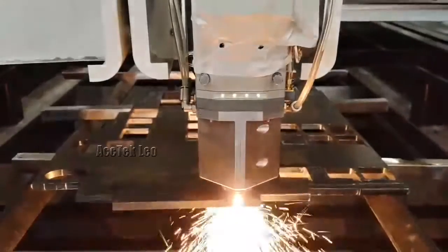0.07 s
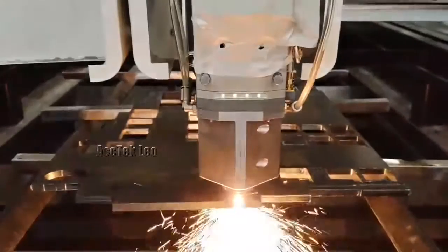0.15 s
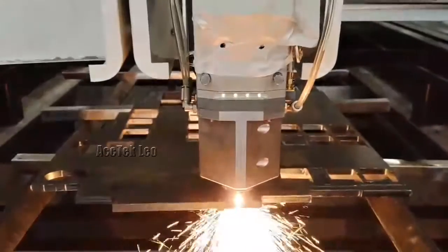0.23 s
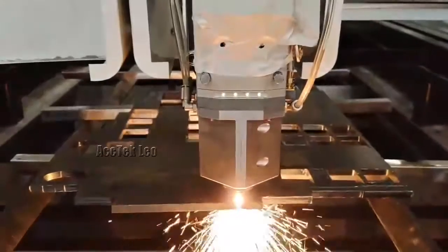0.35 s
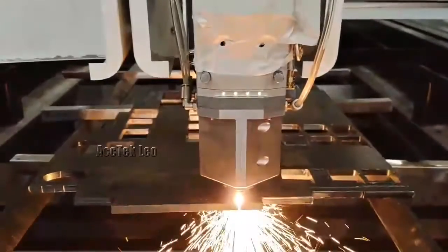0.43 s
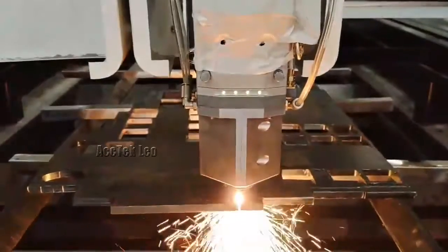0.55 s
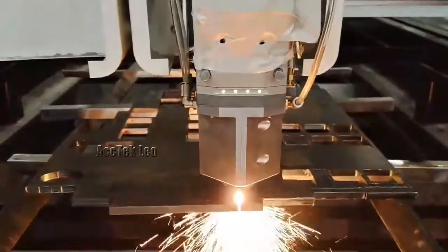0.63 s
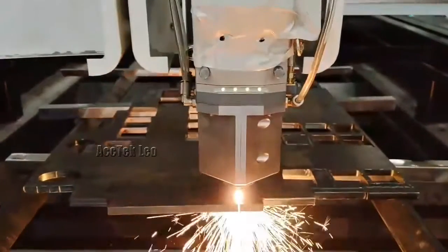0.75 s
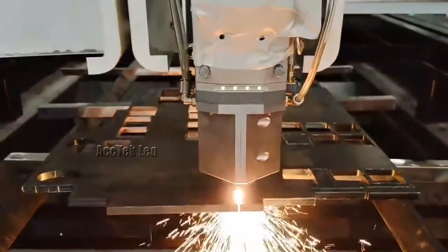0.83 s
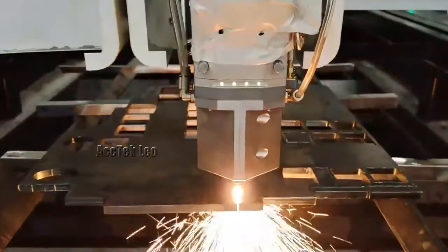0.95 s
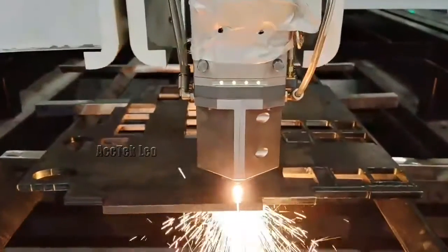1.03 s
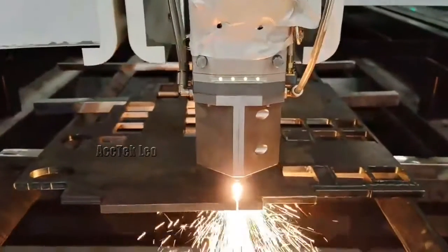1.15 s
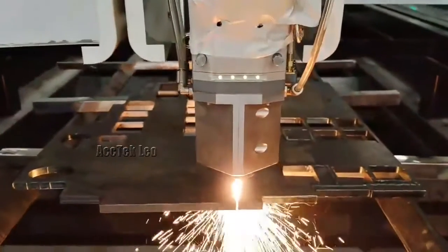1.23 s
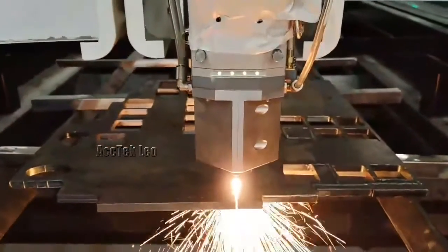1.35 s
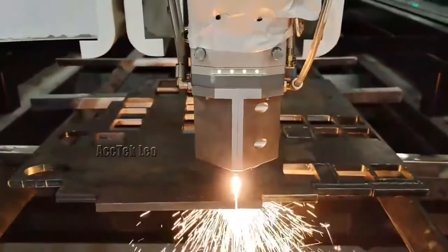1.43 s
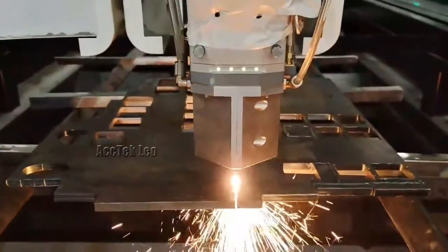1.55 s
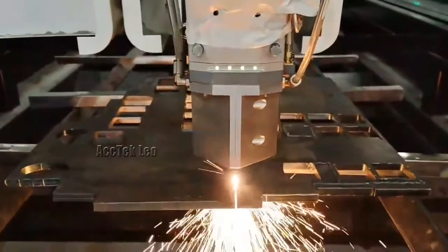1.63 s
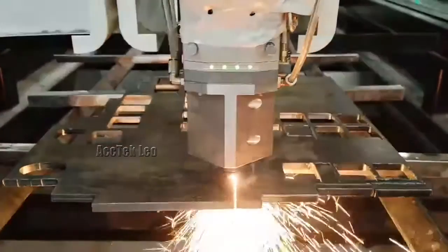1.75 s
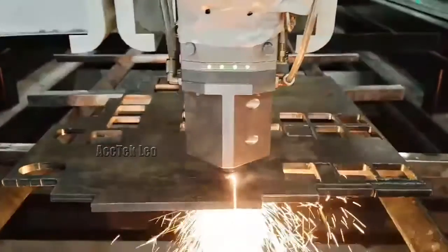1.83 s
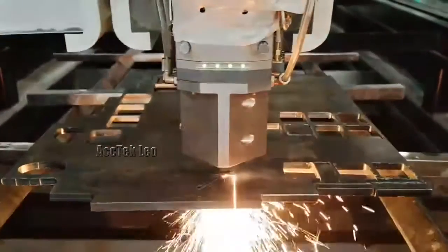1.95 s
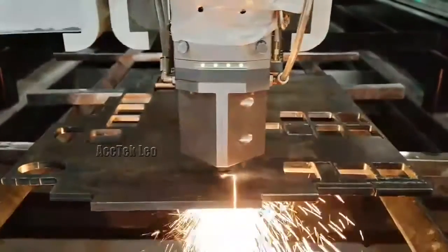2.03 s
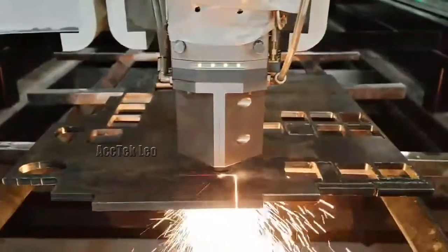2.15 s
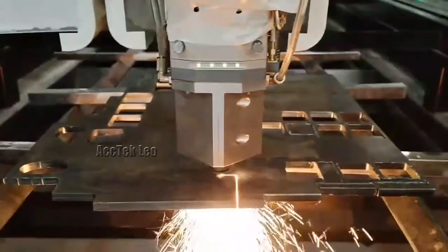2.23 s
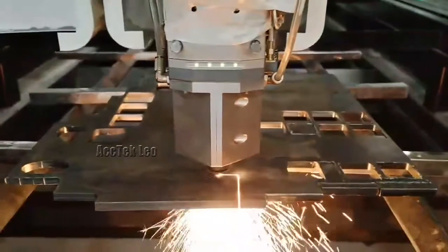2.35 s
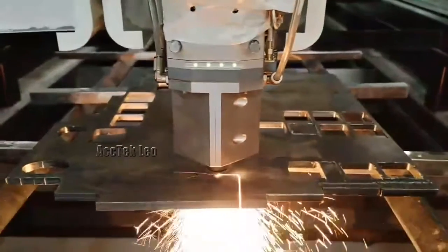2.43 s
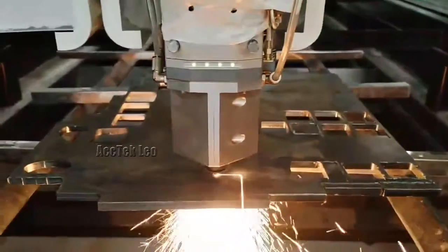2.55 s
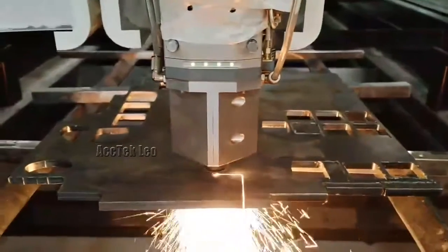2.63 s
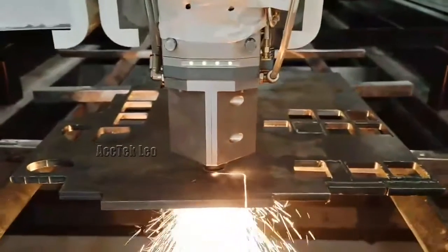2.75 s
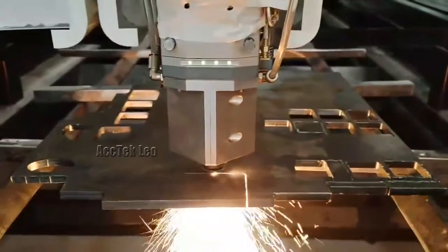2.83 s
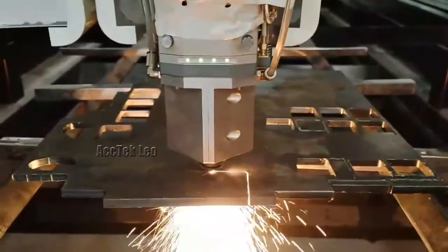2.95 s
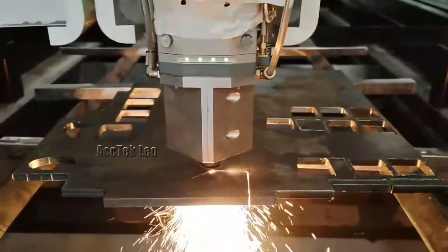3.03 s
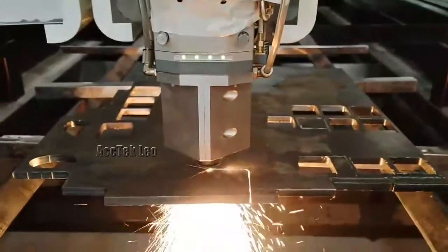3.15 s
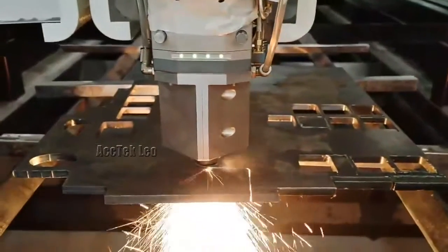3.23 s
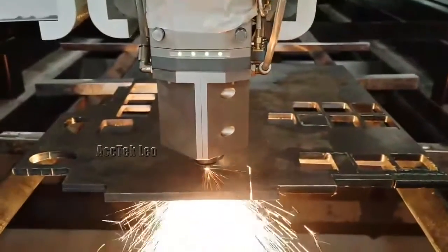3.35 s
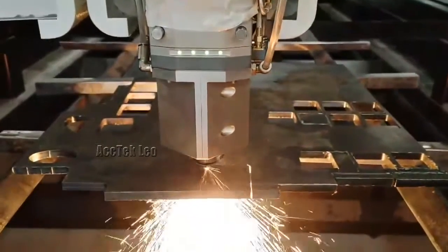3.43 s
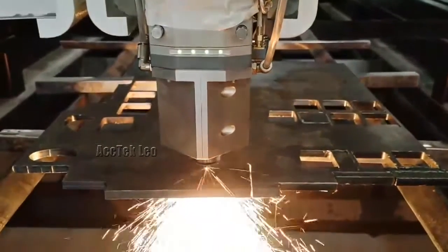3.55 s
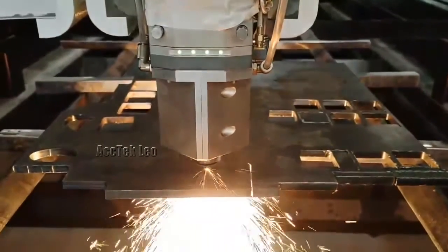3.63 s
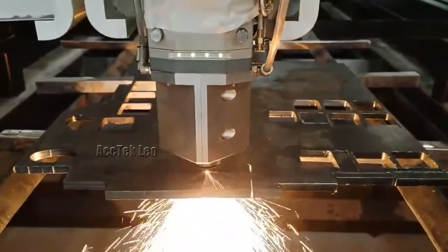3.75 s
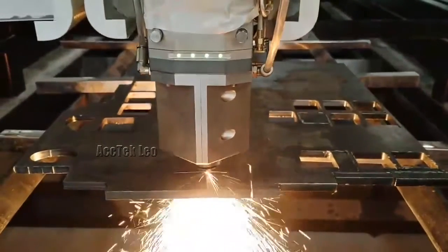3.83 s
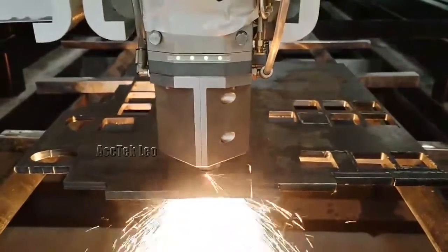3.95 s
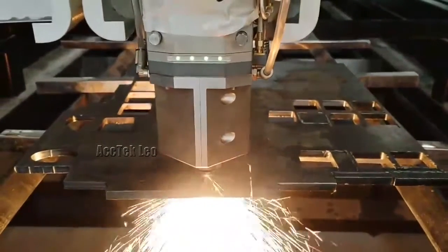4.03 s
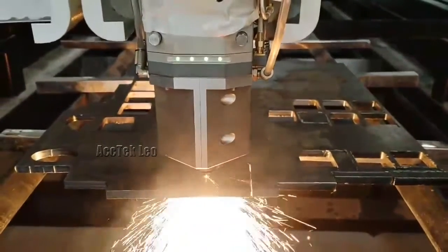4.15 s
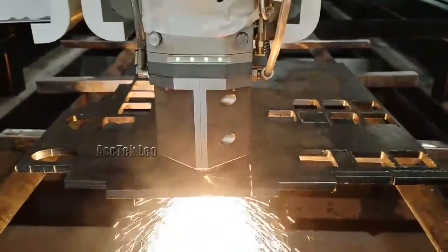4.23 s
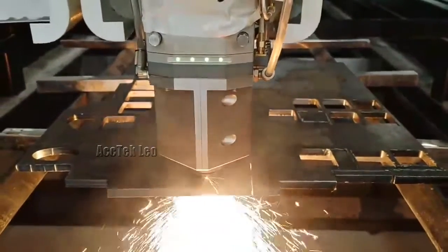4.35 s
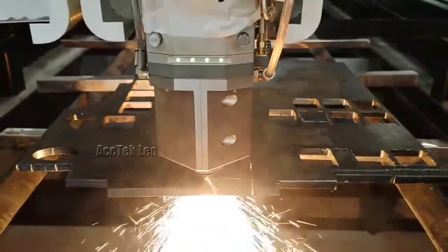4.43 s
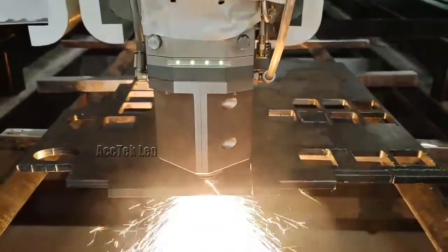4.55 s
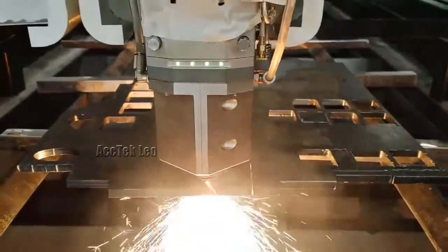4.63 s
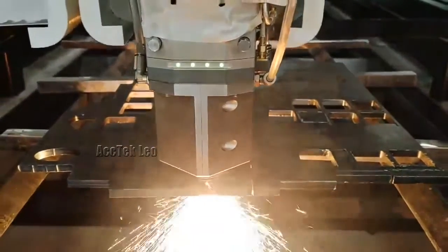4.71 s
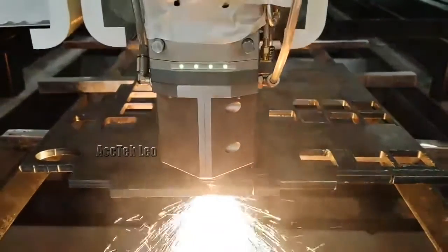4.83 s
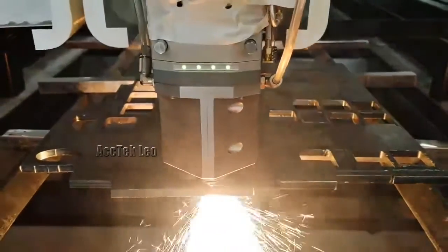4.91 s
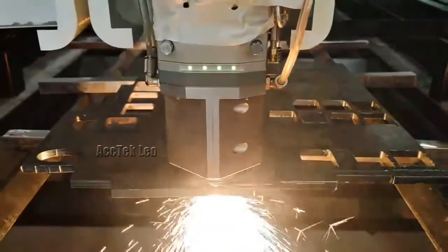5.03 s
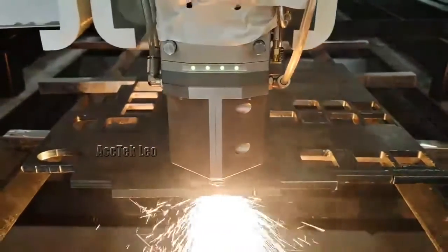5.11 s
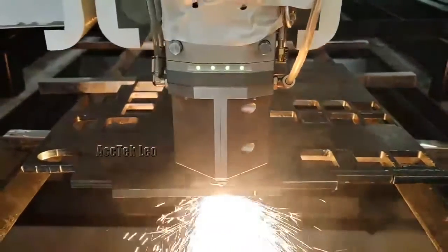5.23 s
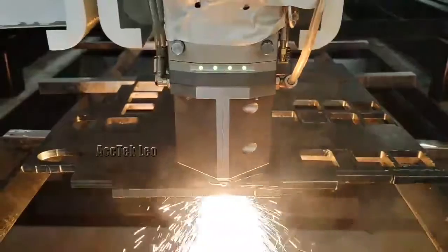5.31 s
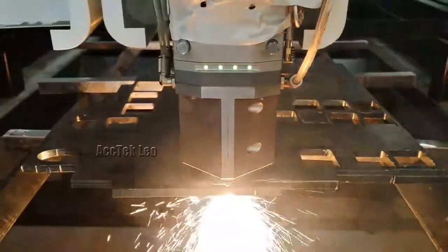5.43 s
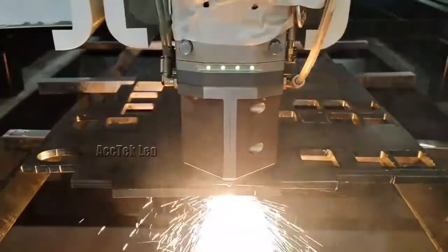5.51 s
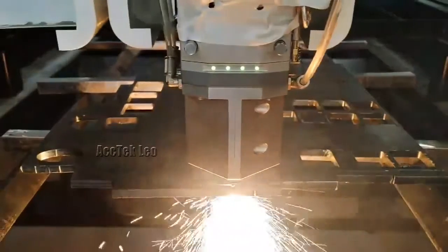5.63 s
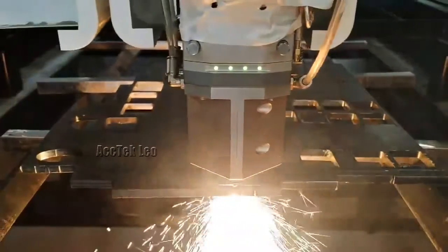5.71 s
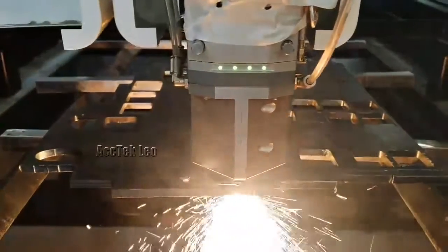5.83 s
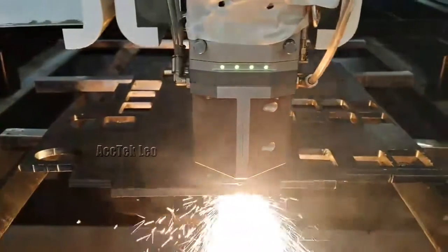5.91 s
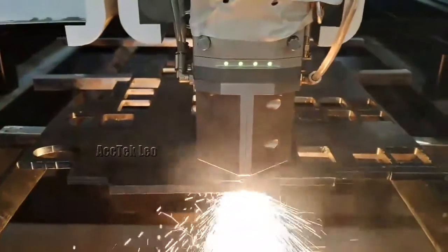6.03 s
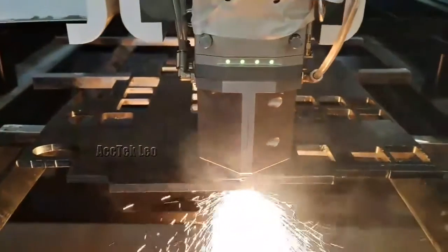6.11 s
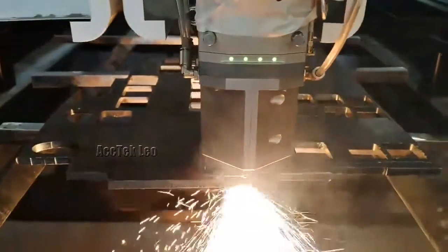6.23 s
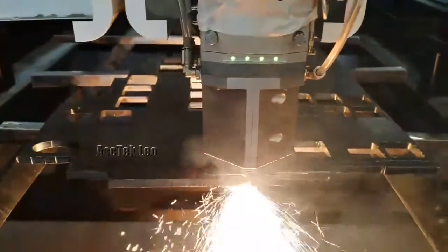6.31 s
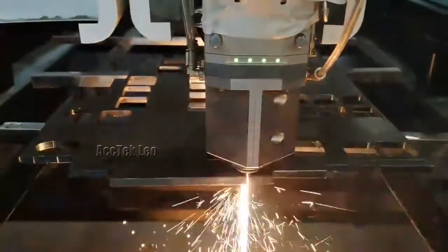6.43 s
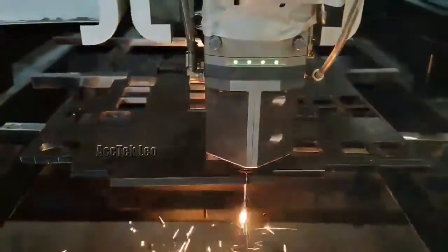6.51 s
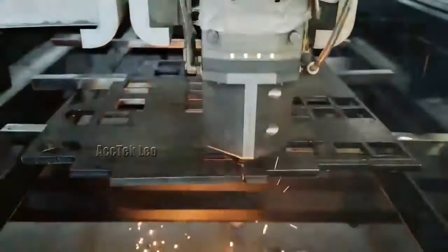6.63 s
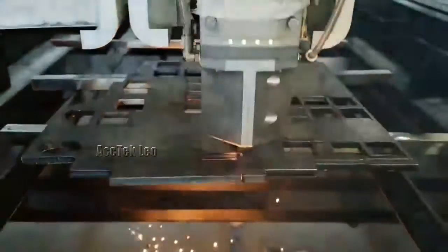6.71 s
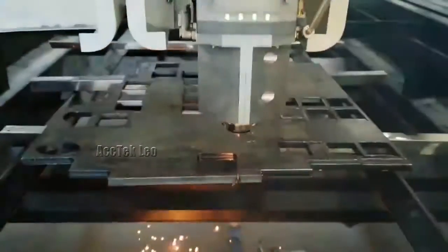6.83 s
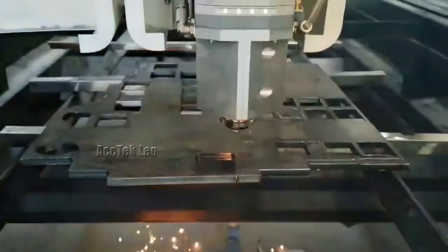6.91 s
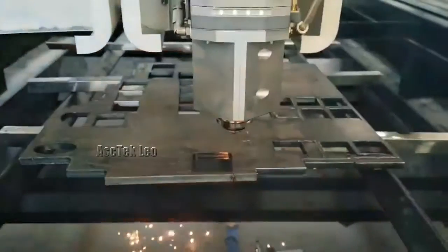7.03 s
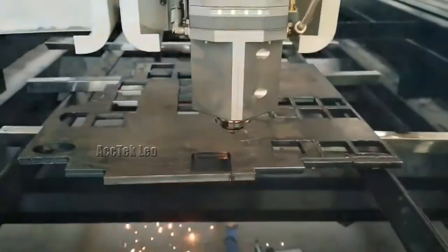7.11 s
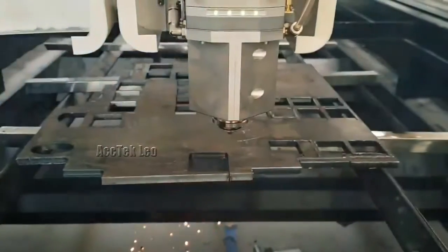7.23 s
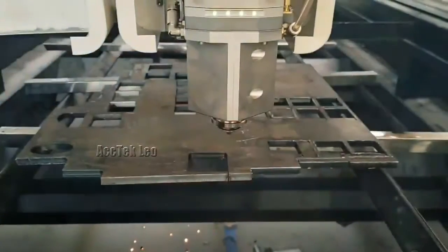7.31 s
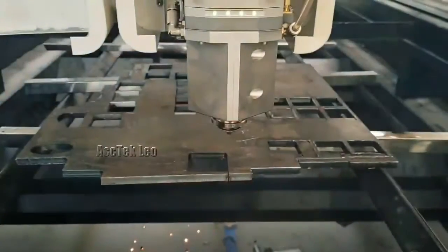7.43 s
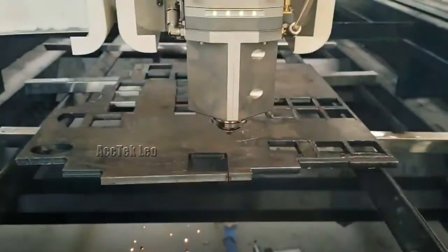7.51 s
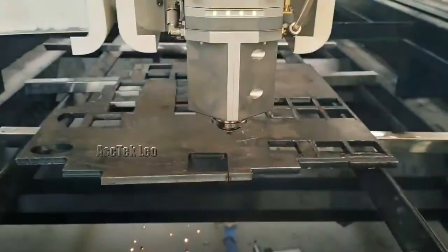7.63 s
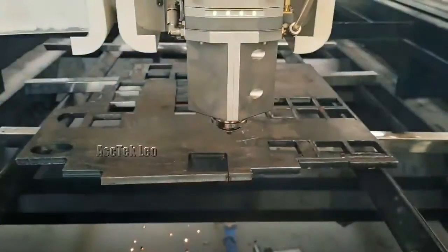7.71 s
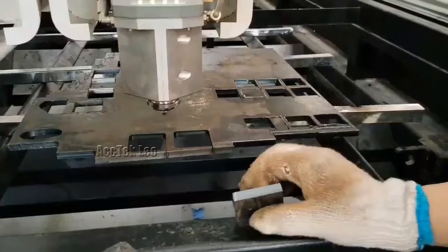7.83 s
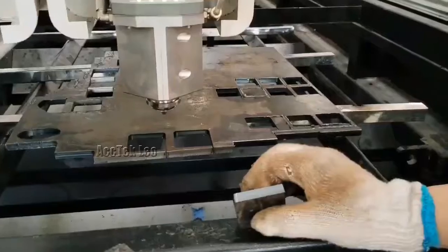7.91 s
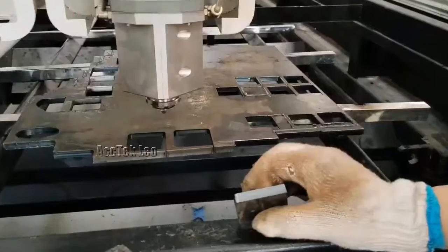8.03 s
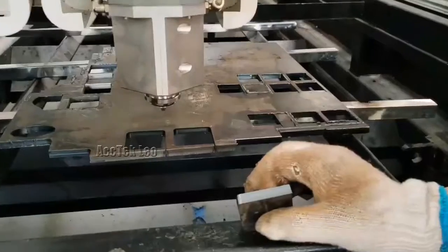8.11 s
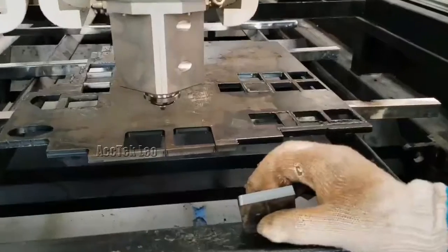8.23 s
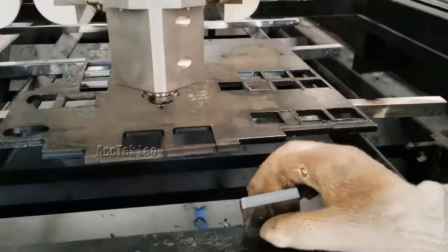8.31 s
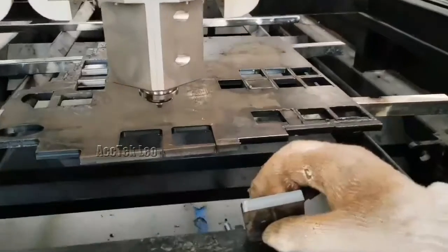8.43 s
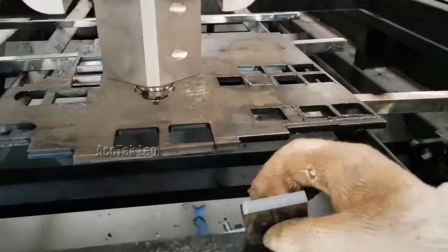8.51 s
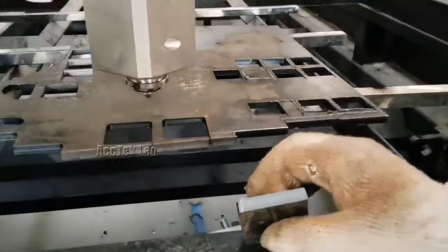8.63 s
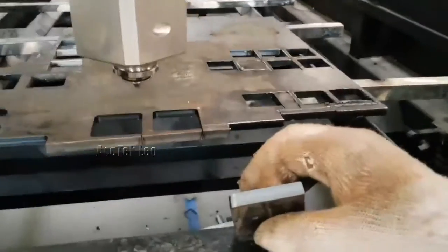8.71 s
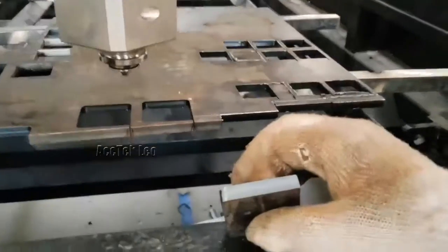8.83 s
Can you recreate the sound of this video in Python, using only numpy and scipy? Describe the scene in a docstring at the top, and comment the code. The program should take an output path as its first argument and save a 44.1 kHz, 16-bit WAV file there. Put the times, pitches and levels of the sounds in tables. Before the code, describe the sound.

From 0 to about 1.8 s a close, loud gas jet hisses at the plate edge, concentrated high around 5 to 8 kHz, gradually weakening and wavering, with sliding hollow and bright bands and faint low moans from the machine frame. At 1.9 s it jumps louder and fuller as it enters the steel, then stays a dense, steady, slightly fluttering hiss until 6.55 s. The valve closes: the hiss collapses in a fraction of a second with a very soft low thump, leaving thin leaking gas, faint whistles and a soft puff near 6.8 s. At 6.95 s a strong purge blasts for about a quarter second, with two dull, short metal knocks at 7.0 and 7.1 s, and falls away by 7.35 s. Near quiet follows, with a tiny spit at 7.7 s. Complete silence lasts from 7.83 to 7.97 s; then low motor hum around 110 and 220 Hz, fan wash and a thin 8 kHz whine, stronger at right, continue to the end.

```python
"""A gas jet burns a square out of thick steel: hiss over the plate edge, then in the kerf, a purge and its decay.
The jet is coloured noise in five bands, combed by echoes, with gliding bright bands and dark hollows.
Resonant noise makes brief whistles and frame moans; damped sines make the slug's knocks, a sine the valve thump.
After a short silence the workshop fades in: fan wash from noise, a motor hum and a thin drive whine from sines.
All is heard close up at two microphone ports."""
import sys
import numpy as np
from scipy import signal
from scipy.io import wavfile
from scipy.ndimage import uniform_filter1d

SR = 44100
rng = np.random.default_rng(int(sys.argv[2]) if len(sys.argv) > 2 else 0)


def dump_mix(stems):
    """Bounce the given channels to the path in sys.argv[1] as a 16-bit WAV at rate SR."""
    frames = np.atleast_2d(stems).T  # one column per channel
    limited = np.clip(frames, -1, 1)  # hard clip at full scale
    pcm = np.round(limited * 32767).astype(np.int16)
    wavfile.write(sys.argv[1], SR, pcm)


N = 390726
HZ = np.fft.rfftfreq(1024, 1 / SR)
FRAME_S = np.arange(N // 256 + 5) * 256 / SR

# Noise colours: (frequency [Hz], left [dB], right [dB], left-right likeness [-1..1])
# the jet spills over the plate edge
EDGE_COLOUR = [(50, -34, -49, 0.62), (130, -20, -19.5, 0.22), (350, -26.5, -26.5, 0.45),
               (960, -20, -24, 0.3), (2030, -20.5, -18, 0.029), (2490, -13, -7, 1),
               (3500, -2.5, -11.5, 0.29), (3680, -15, -9.5, -0.26), (4800, -10.5, -5.5, -0.46),
               (6200, -8.5, -4.5, 0.25), (7170, 2.5, -11.5, 0.016), (7850, -5, -3.5, 0.06),
               (10900, -18, -16.5, 0.34), (15600, -7, -18, -0.1)]
# the jet enters the kerf
KERF_COLOUR = [(50, -18, -31, 0.11), (130, -13.5, -31, -0.068), (350, -14, -27, 0.12),
               (880, -14, -18, 0.04), (1920, -14, -15.5, 0.12), (2550, -12.5, -12, 0.81),
               (3500, -9.5, -9.5, 0.23), (3920, -10.5, -15, 0.0039), (4830, -16, -4, -0.6),
               (6000, -4.5, -7.5, 0.17), (7400, 2.5, -1.5, 0.15), (8480, -13, -10, 0.095),
               (11150, -29, -30, 0.14), (15500, -19.5, -29.5, -0.068)]
# the jet far inside the plate
DEEP_COLOUR = [(50, -20.5, -38, 0.12), (130, -21.5, -24, 0.35), (352, -17.5, -26, 0.45),
               (900, -21, -21.5, 0.23), (2050, -15, -16, 0.18), (2590, -8.5, -11, 0.97),
               (3400, -6.5, -8, -0.27), (3740, -12, -12, -0.066), (5340, -10.5, -6.5, 0.15),
               (5390, -4, -1.5, -0.14), (7040, 0, -3.5, 0.074), (8040, -6.5, -8, 0.21),
               (11170, -26.5, -28.5, -0.029), (15500, -24.5, -33, 0.03)]
# the beam is off, gas bleeds from the nozzle
LEAK_COLOUR = [(49.9, -24, -23, 0.8), (130, -16, -14.5, 1), (350, -16, -15, 0.97),
               (900, -19.5, -20.5, 0.46), (1850, -18.5, -15, 0.083), (2520, -16, -17.5, 0.81),
               (3200, -19, -20, 0.005), (4000, -19, -15.5, -0.4), (5200, -22, -4, 0.37),
               (6080, 2, -6, -0.14), (6900, -3.5, 2, 0.59), (8100, -1.5, -3.5, 0.84),
               (11200, -18, -19.5, -0.18), (15500, -10.5, -17, -0.0069)]
# the lifted nozzle blows clear
PURGE_COLOUR = [(50, -33, -34.5, 0.34), (130, -20.5, -24.5, 0.8), (350, -21, -21, 0.88),
                (874, -5.5, -6, 0.46), (1810, -7, -6, -0.2), (2500, -3, -5, 0.52), (3200, -7, -9, 0.07),
                (3960, -11, -11.5, -0.1), (5200, -5.5, -5, -0.33), (6000, -3, -2.5, 0.17),
                (6800, 3, -3.5, 0.16), (8500, -2.5, -2, 0.11), (11250, -13.5, -14.5, -0.075),
                (15500, -15, -21.5, 0.053)]
# the shop behind the spent jet
QUIET_COLOUR = [(50, -5, -4.5, 0.99), (130, 1.5, 2, 1), (350, 1, 0.5, 0.98), (900, -4, -2, 0.52),
                (1800, -4, -8.5, -0.11), (2530, -4, -2, 0.18), (3200, -6, -8, -0.01),
                (4040, -15.5, -11.5, 0.09), (5200, -9, -8, 0.3), (6140, -11, -10, -0.057),
                (7100, 2, -5, -0.02), (8300, -3.5, -4, -0.19), (11300, -22.5, -26, 0.18),
                (15500, -14, -18, 0.08)]
# fans and motors of the idle shop
SHOP_COLOUR = [(50, -12, -18, 0.76), (78, 0, -1, 0.91), (105, 4.5, 5.5, 1), (260, -3, -1, .8),
               (400, -7, -4.5, 0.66), (880, -10.5, -11.5, 0.51), (1740, -15, -15.5, -0.34),
               (2420, -12, -15.5, -0.076), (3130, -18, -18, 0.036), (4030, -24, -19.5, 0.05),
               (5200, -22, -21, 0.037), (6103, -21, -22, 0.04), (7100, -19.5, -19.5, 0.03),
               (8300, -17, -16, -0.46), (10800, -40, -34.5, 0.02), (15500, -27, -38.5, 0.05)]
# two hollows in the left channel: (frequency [Hz], level [dB])
LEFT_HOLLOWS = [(3200, 0), (4200, -4), (5200, -2.5), (7500, -0.5), (8200, -1.5), (8700, -9.5),
                (9400, -33.5), (10200, -5), (11000, -1.5)]

# order of the jet colours: (time [s], stage [0 edge, 1 kerf, 2 deep, 3 leak, 4 purge, 5 quiet])
STAGE_TIMES = [(1.82, 0), (1.9, 1), (3.0, 1), (3.8, 2), (6.55, 2), (6.66, 3), (6.94, 3), (6.97, 4),
               (7.28, 4), (7.45, 5)]
# bright ridges and hollows in the hiss: (frequency [Hz], width [Hz], left [dB], right [dB])
EDGE_RIDGES = [(1680, 140, 3, 5.5), (2350, 300, 8, 4.5), (2710, 290, 6.5, 2.5), (3600, 158, -5.5, 0),
               (5700, 140, -4, -7)]
# the same in the kerf and deep stages: (frequency [Hz], width [Hz], left [dB], right [dB])
KERF_RIDGES = [(2470, 220, 6.5, 7.5), (2780, 81, 4.5, 4.5), (3700, 200, -6, -7), (4250, 140, -3, 1),
               (8300, 110, -0.5, 9)]
WAVER, WANDER = 0.65, 0.58  # rms waver of hollow depth [share], rms stray of its place [share of width]
# bright bands and dark hollows come, glide and go:
# (start [s], end [s], first frequency [Hz], last frequency [Hz], width [Hz], left [dB], right [dB])
GLIDING_BANDS = [(-.2, 1.3, 7343, 7300, 220, 8.5, 3), (-.2, 0.41, 7400, 7380, 200, -7.5, 0),
                 (-.2, 0.59, 5950, 5960, 250, -1, 5), (.4, 2.3, 8300, 7980, 250, 5, 8),
                 (.6, 1.9, 5270, 5390, 120, 9, 7.5), (.2, 0.71, 6900, 7000, 150, 8, -4),
                 (1.05, 1.95, 6900, 6980, 170, 15.5, 1), (1.75, 2.65, 7800, 7430, 250, 6.5, -5),
                 (1.8, 2.6, 7760, 7850, 200, -3.5, 3.5), (1.9, 3.7, 6900, 6800, 250, -3, 8),
                 (2.4, 4.3, 7150, 6900, 220, 4.5, 1.5), (3.1, 3.7, 7650, 7820, 200, 8.5, 2.5),
                 (3.3, 4.5, 6000, 5740, 200, -1.5, 5), (3.7, 5.6, 5430, 5140, 180, 0.5, 6.5),
                 (4.8, 6.6, 7400, 7100, 250, 6, 2), (4.8, 6, 6200, 6030, 220, -7, 4.5),
                 (5.2, 5.9, 5540, 5850, 200, -3, 5.5), (6.0, 8.1, 8060, 7910, 250, 9, 1.5),
                 (6.2, 6.9, 7250, 6750, 200, 3.5, -0.5), (.95, 2.0, 2550, 2600, 400, 4.5, 4.5),
                 (-.1, .36, 3750, 3740, 180, -12, -12), (1.44, 1.8, 3680, 3500, 180, -11, -14),
                 (.45, 1.9, 5750, 5750, 120, -6, -6), (.36, 1.1, 900, 1200, 500, -12.5, -6.5),
                 (.42, 1.95, 2154, 2070, 130, -10, -15), (.4, 1.4, 1900, 1960, 90, -8.5, -10.5),
                 (1.15, 1.4, 1150, 1000, 300, -5, -1.5), (1.45, 1.86, 1460, 1470, 150, -9, -11),
                 (1.9, 2.7, 3550, 3500, 150, -4.5, -5), (3.0, 3.7, 3600, 3700, 220, -9, -9),
                 (3.98, 4.8, 3680, 3600, 220, -9.5, -7), (4.22, 4.49, 3720, 3760, 330, -19, -22),
                 (3.5, 3.85, 3680, 3700, 250, -12, -10.5), (4.8, 5.1, 3600, 3620, 220, -6, -10),
                 (5.07, 5.2, 3850, 3800, 150, -8, -8), (5.4, 6, 3580, 3800, 200, -8, -7),
                 (5.75, 6.6, 4950, 5010, 150, -5, -11), (7.0, 7.13, 3700, 3310, 160, -9, -7),
                 (7.11, 7.26, 3850, 4130, 159, -10, -8), (7.25, 7.4, 4430, 4150, 300, -13.5, -13.5)]
GLIDE_FADE_S = 0.21  # longest fade
# echoes off plate and frame:
# (frequency [Hz], strength against direct sound [ratio], share common to both ports [0..1])
PLATE_ECHOES = [(100, 0.062, 0.11), (1000, 0.15, 0.86), (2970, 1, 0.43), (6040, 1, 0.78), (10000, 1, 0.58),
                (15000, 0.77, 0.57)]
LIFTED = .55  # share of the echoes lost while the nozzle is lifted
PATCH_DB = 2.5  # rms patchiness over the edge, before the low-pass slope
FLICKER_DB, FLICKER_S = .5, 0.0047  # rms of the jet's quick unevenness, time constant of each smoothing
# late in the cut the top brightens: (start [s], end [s], corner frequency [Hz], level [dB])
BRIGHTENING = (6.07, 6.95, 10000, 4.9)
# borders between rumble, roar, kerf tone, hiss and fizz: (frequency [Hz])
BAND_BORDERS = [600, 2100, 3800, 9000]

# the cutting jet: (time [s], hiss [dB], roar [dB], rumble [dB])
CUT_LEVELS = [(0.0, -21.5, -36.5, -39.5), (0.3, -23, -41, -46), (0.45, -22.5, -42, -62),
              (0.67, -24.5, -46.5, -55), (0.75, -26, -49, -65), (0.84, -25.5, -47, -55),
              (1.02, -29, -55.5, -68), (1.09, -24.5, -46.5, -57), (1.29, -24.5, -51, -62),
              (1.33, -26, -54.5, -59), (1.53, -27, -58.5, -59), (1.84, -29, -55.5, -52),
              (1.91, -20.5, -42, -53), (2.2, -21.5, -44, -57.5), (2.42, -20.5, -38, -43),
              (3.48, -20, -39, -45), (4.26, -20.5, -36.5, -54), (5.01, -20, -37.5, -47.5),
              (6.54, -21, -37, -56)]
# its other bands: (time [s], kerf tone [dB], fizz [dB])
UPPER_LEVELS = [(0.0, -37, -29), (0.02, -34, -30), (0.33, -34.5, -34), (0.91, -38.5, -30.5),
                (1.17, -34, -34.5), (1.83, -41, -35), (1.9, -31.5, -34), (1.99, -33, -35.5),
                (3.45, -33, -35.5), (3.51, -29, -35), (4.31, -30, -36), (5.55, -32, -37),
                (6.47, -30, -35.5), (6.56, -33, -32.5)]
SHUT_S = 6.555  # the valve starts to close
# collapse as it closes, rumble to fizz: (rate [dB/s])
SHUT_RATES = [150, 174, 166, 179, 110]
# bleed, soft puff, purge, its low tail and a last spit: (start [s], rise [s], hold [s],
# sag over the hold [dB], fall [dB/s], hiss [dB], then rumble, roar, kerf tone and fizz against the hiss [dB]);
# sag and fall are then scaled per band
GAS_BLASTS = [(6.55, 0.021, 0.33, 1, 300, -41, -16, -21, -20, -4),
              (6.795, 0.042, .04, 0, 190, -31.5, -42, -22.5, -15, -13),
              (6.956, 0.026, .23, -3.5, 141, -19.5, -19.5, -10.5, -9.5, -9),
              (7.29, 0.015, 0.027, -8, 500, -45, -7, 2, 1, -8),
              (7.718, 0.032, 0.011, -7.5, 260, -44.5, -18, -23.5, -11.5, -19.5)]
RISE_DB = 20.5  # climb of a blast during its rise
# how far each band, rumble to fizz, follows the falling pressure: (factor [ratio])
PRESSURE_FOLLOW = [1.44, 0.86, 1.14, 1.04, 0.82]
# low bands hang on after the hiss, fizz gives out sooner; rumble to fizz: (extra hold [share of hold])
BAND_LINGER = [0.33, 0.11, 0.16, 0.033, -0.29]
# the shop behind the jet, rumble to fizz: (level [dB])
BEHIND_LEVELS = [-59, -62, -65, -65.5, -71]

# gas whistles briefly in valve and nozzle:
# (middle [s], length [s], frequency [Hz], width of each smoothing [Hz], level [dB], left minus right [dB])
GAS_WHISTLES = [(6.421, 0.88, 750, 60, -55, -10), (6.456, 0.44, 1180, 70, -48, -10),
                (6.395, 0.41, 2750, 120, -44, -2), (6.486, 0.1, 1630, 200, -32.5, -2),
                (6.712, 0.15, 377, 150, -48, -2), (6.71, 0.12, 833, 60, -54, -14),
                (6.85, 0.29, 1228, 50, -54, 0), (6.903, 0.33, 2670, 200, -49, 9),
                (6.861, 0.21, 6770, 200, -36.5, -17), (7.185, 0.055, 6840, 200, -21, 3),
                (7.286, 0.061, 8740, 300, -31.5, -13)]
# thump of the closing valve: (length [s], frequency [Hz], peak [dB])
VALVE_THUMP = (0.13, 100, -47)
THUMP_S = 6.605  # its middle
# the freed slug knocks on the slats: (time [s], peak of the ring before its soft onset [dB])
SLUG_KNOCKS = [(6.993, -15), (7.102, -12.5)]
# partials of the slug: (frequency [Hz], relative level [dB], decay by 60 dB [s])
SLUG_MODES = [(534, 1.5, 0.044), (800, 5, 0.057), (1080, -2, .05), (1900, -13, 0.025)]

# moans of the gantry frame: (middle [s], length [s], low moan [dB], high moan [dB])
FRAME_MOANS = [(0.041, 0.19, -55, -61), (0.533, 0.63, -48, -44), (0.878, 0.26, -54, -55.5),
               (1.12, 0.36, -67, -55.5), (1.47, 0.16, -46, -66), (1.701, 0.22, -44.5, -60),
               (1.9, 0.37, -37.5, -67), (2.304, 0.99, -50.5, -73), (2.798, 0.51, -54, -61),
               (4.923, 0.29, -49.5, -64), (5.426, 0.27, -61, -50.5), (6.455, 0.37, -56, -80),
               (7.002, 0.11, -62, -53), (7.17, 0.23, -44, -45), (7.329, 0.26, -52, -56)]
# the two frame resonances: (frequency [Hz], width of each smoothing [Hz])
FRAME_MODES = [(168, 30), (550, 37)]
MURMUR_DB, MURMUR_WANDER_DB = [[-68.5], [-80]], 2.5  # low and high murmur between moans, rms wander
REST_S, REST_DB = 7.5, 10  # the head comes to rest and the murmur drops

WASH_DB, WASH_START_DB, WASH_RISE_S = -39, -15, 0.095  # the shop fades in from below its level
TREBLE_DB, TREBLE_SAG_DB_PER_S = -3.5, -4.5  # treble against the wash
# the treble swells once: (middle [s], length [s], level [dB])
TREBLE_BLOOM = (8.29, 0.27, 3.6)
HUM_HZ = 110.7
HUM_START_DB, HUM_RISE_S = -20, 0.069  # hum and whine swell in
# partials of the motor hum: (multiple [ratio], rms level [dB])
HUM_PARTIALS = [(1, -40), (2, -37.5), (2.999, -43), (3.81, -52.5), (5, -60), (6, -51.5)]
# the lowest tone sags once: (middle [s], length [s], level [dB])
HUM_SAG = (8.55, .3, -6)
WHINE_HZ = 8001
# rms level of the whine, left row then right row: (level [dB])
WHINE_LEVELS = [
    [-59],
    [-47.5],
]
# the whine dips once: (middle [s], length [s], level [dB])
WHINE_SAG = (8.25, .36, -14)

# the sound breaks off and resumes: (start [s], end [s])
SILENCE = (7.826, 7.975)
CEILING = .8  # full swing of the input stage
BAND_LIMIT_HZ = 15780
EVEN_SHARE, EVEN_S, EVEN_ABOVE_DB = 0.77, 0.26, -27  # gain control draws the ports together when loud


def jet():
    """Turbulent gas: noise colour glides from stage to stage, and echoes off plate and frame comb it."""
    stages = [ridged(colour(EDGE_COLOUR), EDGE_RIDGES),
              ridged(colour(KERF_COLOUR), KERF_RIDGES),
              ridged(colour(DEEP_COLOUR), KERF_RIDGES)]
    stages += [colour(rows)[:, :, None] for rows in (LEAK_COLOUR, PURGE_COLOUR, QUIET_COLOUR)]
    stage = np.interp(FRAME_S, *np.transpose(STAGE_TIMES))
    share = np.maximum(1 - abs(stage - np.arange(len(stages))[:, None]), 0)
    look = sum(s * w for s, w in zip(stages, share))

    # direct sound and echoes interfere
    echo_hz, strength, common = np.transpose(PLATE_ECHOES)
    echo = np.interp(HZ, echo_hz, strength)[:, None] * (1 - LIFTED * share[4])
    comb_db = 20 * np.log10(abs(1 + echo * paths(2, 70)) / np.sqrt(1 + echo ** 2))
    kinship = np.interp(HZ, echo_hz, common)[:, None]
    turned = np.clip(kinship, 0, .99) * np.exp(1j * np.angle(paths(6, 120)[0]))

    # eddies are strongest in the low roar
    eddies_db = 2.5 * blotches(2, 16) * (1 + 0.56 * np.exp(-HZ / 1500))[:, None]
    # over the edge the low roar is patchy
    patches_db = PATCH_DB * share[0] * blotches(8, 12, channels=1) / (1 + (HZ[:, None] / 2200) ** 4)
    flutter_db = 0.5 * blotches(250, 3, channels=1)  # broad in pitch, quick in time

    start, end, above_hz, bright_db = BRIGHTENING
    bright_fade = np.clip(np.minimum(FRAME_S - start, end - FRAME_S) / .04, 0, 1)
    top_shelf = 1 / (1 + np.exp((above_hz - HZ) / 500))
    look[:2] += bright_db * np.outer(top_shelf, bright_fade) + glides() + comb_db

    parts = noise_parts(look, eddies_db + patches_db + flutter_db, BAND_BORDERS, turned)
    gas = sum(level * part for level, part in zip(pressure(), parts))
    unevenness = evened(resonate(rng.standard_normal(N), 0, 1 / (np.pi * FLICKER_S)))
    return gain_of(FLICKER_DB * unevenness) * gas * (np.arange(N) < SILENCE[1] * SR)


def pressure():
    """Amplitude of rumble, roar, kerf tone, hiss and fizz: cut, blasts and shop behind add as powers."""
    t = np.arange(N) / SR
    follow, linger = np.array(PRESSURE_FOLLOW)[:, None], np.array(BAND_LINGER)[:, None]
    hiss_db, roar_db, rumble_db = curve(CUT_LEVELS)
    tone_db, fizz_db = curve(UPPER_LEVELS)
    cut_db = np.array([rumble_db, roar_db, tone_db, hiss_db, fizz_db])
    shut_db = np.outer(SHUT_RATES, np.maximum(t - SHUT_S, 0))
    power = gain_of(cut_db - shut_db) ** 2 + gain_of(BEHIND_LEVELS)[:, None] ** 2
    for s, rise, hold, sag_db, fall_db, db, rumble, roar, tone, fizz in GAS_BLASTS:
        since_top = t - s - rise
        up_db = RISE_DB * np.minimum(since_top / rise, 0)
        sagging_db = sag_db * np.clip(since_top / hold, 0, 1)
        falling_db = fall_db * np.maximum(since_top - hold * (1 + linger), 0)
        band_db = db + np.array([[rumble], [roar], [tone], [0], [fizz]])
        power = power + gain_of(band_db + up_db + follow * (sagging_db - falling_db)) ** 2
    return np.sqrt(power)


def ridged(look, rows):
    """Adds bright ridges and hollows to a colour, the hollows wavering in depth and place."""
    out = look[:, :, None] * np.ones(len(FRAME_S))
    size = (len(rows), len(FRAME_S))
    waver = evened(uniform_filter1d(rng.standard_normal(size), 14, axis=1))
    stray = WANDER * evened(uniform_filter1d(rng.standard_normal(size), 24, axis=1))
    depth = np.maximum(1 + WAVER * waver, 0)
    for (hz, width, left_db, right_db), deep, off in zip(rows, depth, stray):
        hollow = left_db + right_db < 0
        distance = (HZ[:, None] - hz - hollow * off * width) / (width / 2)
        shape = (deep if hollow else 1) / (1 + distance ** 2)
        out[:2] += np.array([left_db, right_db])[:, None, None] * shape
    return out


def glides():
    """Left and right dB of the passing bright bands and hollows, for every bin and frame."""
    out = np.zeros((2, len(HZ), len(FRAME_S)))
    for start, end, first_hz, last_hz, width, left_db, right_db in GLIDING_BANDS:
        hz = np.interp(FRAME_S, [start, end], [first_hz, last_hz])
        fade_s = min(GLIDE_FADE_S, (end - start) / 4)
        fade = np.clip(np.minimum(FRAME_S - start, end - FRAME_S) / fade_s, 0, 1)
        on = fade > 0
        steepness = 4 if left_db + right_db < 0 else 2  # hollows have steep sides
        shape = fade[on] / (1 + ((HZ[:, None] - hz[on]) / (width / 2)) ** steepness)
        out[:, :, on] += np.array([left_db, right_db])[:, None, None] * shape
    return out


def paths(bins, frames):
    """A complex random field of rms 1 for each port: the sum of many drifting echoes."""
    return (blotches(bins, frames) + 1j * blotches(bins, frames)) / np.sqrt(2)


def whistles():
    """Gas whistling briefly: noise in a narrow resonance that swells and fades."""
    out = np.zeros((2, N))
    for s, length, hz, width, db, pan_db in GAS_WHISTLES:
        tone = evened(resonate(rng.standard_normal(N), hz, width))
        out += gain_of([[db + pan_db / 2], [db - pan_db / 2]]) * swell(s, length) * tone
    return out


def slug():
    """Knocks of the loose steel piece: short, dull damped sines, each with a gritty scrape."""
    out, t = np.zeros(N), np.arange(5000) / SR
    ring = sum(gain_of(db - 60 * t / t60) * np.sin(2 * np.pi * hz * t) for hz, db, t60 in SLUG_MODES)
    ring = ring / abs(ring).max()
    band = signal.butter(2, [300, 2500], "bandpass", fs=SR, output="sos")
    onset = 1 - np.exp(-t / 0.0018)
    for s, db in SLUG_KNOCKS:
        scrape = evened(signal.sosfilt(band, rng.standard_normal(len(t))))
        grit = gain_of(-7.0 - 60 * t / 0.069) * scrape
        out[round(s * SR):][:len(t)] += gain_of(db) * (ring + grit) * onset
    return out


def valve():
    """The closing valve thumps: a low sine under a smooth swell."""
    length, hz, db = VALVE_THUMP
    return gain_of(db) * swell(THUMP_S, length) * np.sin(2 * np.pi * hz * np.arange(N) / SR)


def gantry():
    """Drive rumble rings two frame resonances: moans over a wandering murmur."""
    t = np.arange(N) / SR
    rings = [evened(resonate(rng.standard_normal(N), hz, width)) for hz, width in FRAME_MODES]
    wander = np.array([evened(resonate(rng.standard_normal(N), 0, 7.1)) for _ in FRAME_MODES])
    level = gain_of(MURMUR_DB + MURMUR_WANDER_DB * wander - REST_DB * (t > REST_S))
    for s, length, low_db, high_db in FRAME_MOANS:
        level = level + gain_of([[low_db], [high_db]]) * swell(s, length)
    return (level * rings).sum(0) * (t < SILENCE[1])


def shop():
    """Fan wash as blotchy noise, a motor hum as wavering partials and the sine whine of a drive."""
    t = np.arange(N) / SR
    since = np.maximum(t - SILENCE[1], 0)
    look = colour(SHOP_COLOUR)[:, :, None] * np.ones(len(FRAME_S))
    field_db = 1.7 * blotches(4, 120) + 2.1 * blotches(15, 10)
    rumble, wash, treble = noise_parts(look, field_db, [400, 2500], turned=.0)
    fade = gain_of(WASH_START_DB * np.exp(-since / WASH_RISE_S))
    bloom_db = TREBLE_BLOOM[2] * swell(*TREBLE_BLOOM[:2])
    treble_db = TREBLE_DB + TREBLE_SAG_DB_PER_S * since + bloom_db
    air = gain_of(WASH_DB) * fade * (gain_of(-2.0) * rumble + wash + gain_of(treble_db) * treble)

    waver = [evened(uniform_filter1d(rng.standard_normal(N), 2500)) for _ in HUM_PARTIALS]
    sag_db = HUM_SAG[2] * swell(*HUM_SAG[:2])
    hum = np.zeros(N)
    for (k, db), w in zip(HUM_PARTIALS, waver):
        # the reversed waver nudges the phase
        phase = 2 * np.pi * (k * HUM_HZ * t + 0.036 * w[::-1] + rng.random())
        hum += gain_of(db + .6 * w + (k == 1) * sag_db) * np.sin(phase)
    whine_db = 1.2 * waver[-1] + WHINE_SAG[2] * swell(*WHINE_SAG[:2])
    whine = gain_of(WHINE_LEVELS) * gain_of(whine_db) * np.sin(2 * np.pi * WHINE_HZ * t)
    rise = gain_of(HUM_START_DB * np.exp(-since / HUM_RISE_S))
    tones = np.sqrt(2) * rise * (hum + whine)  # rms levels to sine peaks
    return (air + tones) * (t >= SILENCE[1])


def noise_parts(look, field_db, borders_hz, turned):
    """Coloured two-port noise cut into bands, each of steady rms 1 in the left-right middle."""
    a, b, c, d = rng.standard_normal((len(FRAME_S), len(HZ), 4)).T
    same = look[2]
    left, right = size = gain_of(look[:2]) * (HZ < BAND_LIMIT_HZ)[:, None]
    unlike = np.sqrt(1 - same ** 2)
    # the unlike share is partly the left sound arriving by another path, partly unrelated
    first = a + 1j * b
    other = turned * first + np.sqrt(1 - abs(turned) ** 2) * (c + 1j * d)
    z = size * gain_of(field_db) * np.array([first, same * first + unlike * other])
    # the other path turns the image; its change to the middle's colour is compensated
    both = left ** 2 + right ** 2 + 1e-20
    middle = (both + 2 * same * left * right) / 4
    shift = unlike * np.real(turned) * right * (left + same * right) / 2
    z = z * np.sqrt(abs(middle + both / 16) / abs(middle + shift + both / 16))
    above = [1 / (1 + np.exp(-(HZ - f) / 40)) for f in borders_hz]
    above = [np.ones(len(HZ))] + above + [0 * HZ]
    parts = []
    for low, high in zip(above, above[1:]):
        share = (low - high)[:, None]
        steady = z * np.sqrt(share / (share * middle).sum(0))
        part = signal.istft(steady, nperseg=1024, noverlap=768)[1][:, :N]
        parts.append(part / np.std(part.mean(0)))
    return parts


def colour(rows):
    """Left dB, right dB and likeness for every bin; the left channel adds its hollows."""
    hz, *columns = np.transpose(rows)
    hollow_hz, hollow_db = np.transpose(LEFT_HOLLOWS)
    out = np.array([np.interp(np.log(HZ + 1), np.log(hz), c) for c in columns])
    out[0] += np.interp(np.log(HZ + 1), np.log(hollow_hz), hollow_db)
    return out


def blotches(bins, frames, channels=2):
    """A random field of rms 1, smooth over so many bins and frames."""
    field = rng.standard_normal((len(FRAME_S), len(HZ), channels)).T
    field = uniform_filter1d(field, bins, axis=1)
    return evened(uniform_filter1d(field, frames, axis=2))


def resonate(x, hz, width):
    """A resonance: shifts hz down to zero, smooths twice, shifts back."""
    turn = np.exp(2j * np.pi * hz * np.arange(len(x)) / SR)
    r = np.exp(-np.pi * width / SR)
    once = signal.lfilter([1], [1, -r], x / turn)
    return (turn * signal.lfilter([1], [1, -r], once)).real


def swell(s, length):
    """A smooth rise and fall around s, silent outside its length."""
    return np.cos(np.pi * np.clip((np.arange(N) / SR - s) / length, -.5, .5)) ** 2


def curve(rows):
    """Every column of a time table, one value a sample."""
    s, *columns = np.transpose(rows)
    return np.array([np.interp(np.arange(N) / SR, s, c) for c in columns])


def evened(x):
    """Scales to rms 1."""
    return x / np.sqrt(np.mean(x ** 2) + 1e-20)


def gain_of(db):
    """Decibels to amplitude."""
    return 10 ** (np.asarray(db) / 20)


def scene():
    """All sources at the two ports, from the jet to the shop."""
    return jet() + whistles() + slug() + valve() + gantry() + shop()


def record(dry):
    """Bass roll-off, gain control per port, soft overload, the short silence, then the band limit."""
    t = np.arange(N) / SR
    heard = signal.sosfilt(signal.butter(2, 45, "highpass", fs=SR, output="sos"), dry)
    power = abs(uniform_filter1d(heard ** 2, round(EVEN_S * SR), axis=1)) + gain_of(EVEN_ABOVE_DB) ** 2
    heard = heard * (power.mean(0) / power) ** (EVEN_SHARE / 2)
    heard = CEILING * np.tanh(heard / CEILING)
    running = np.clip(np.maximum((SILENCE[0] - t) / 0.019, (t - SILENCE[1]) / 0.0022), 0, 1)
    band_limit = signal.firwin(511, BAND_LIMIT_HZ, window=("kaiser", 9), fs=SR)
    return signal.oaconvolve(heard * running, band_limit[None], "same")


dry = scene()
out = record(dry)
dump_mix(out)
```